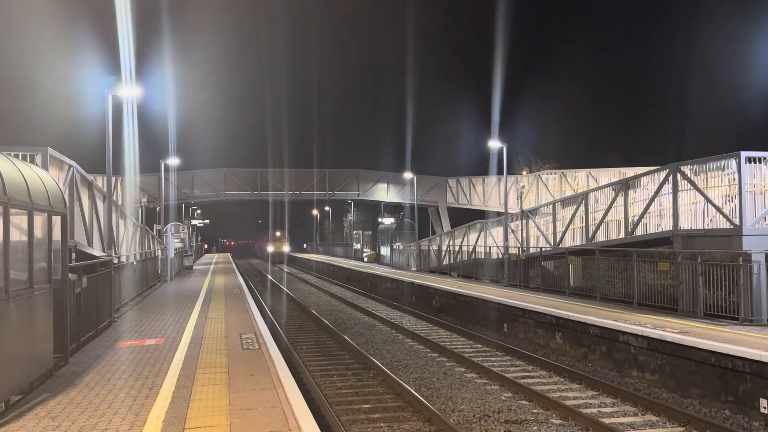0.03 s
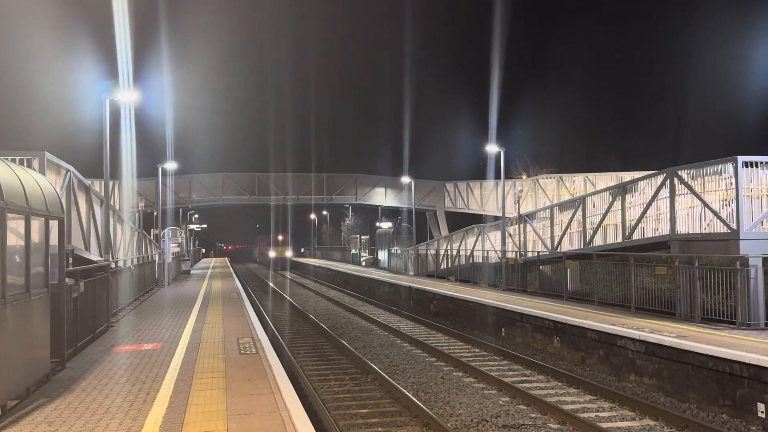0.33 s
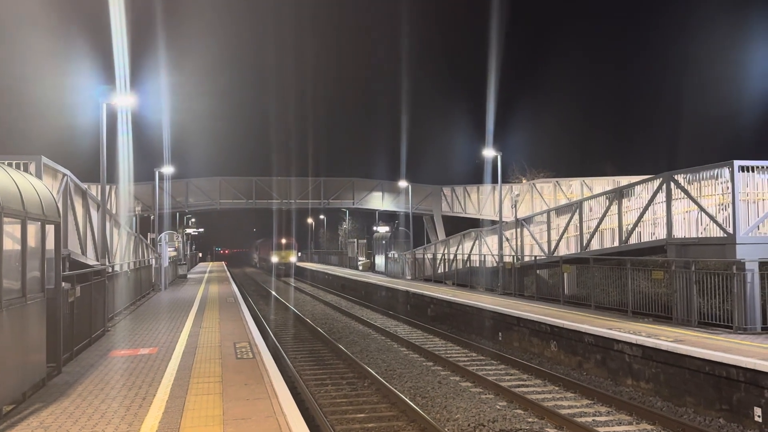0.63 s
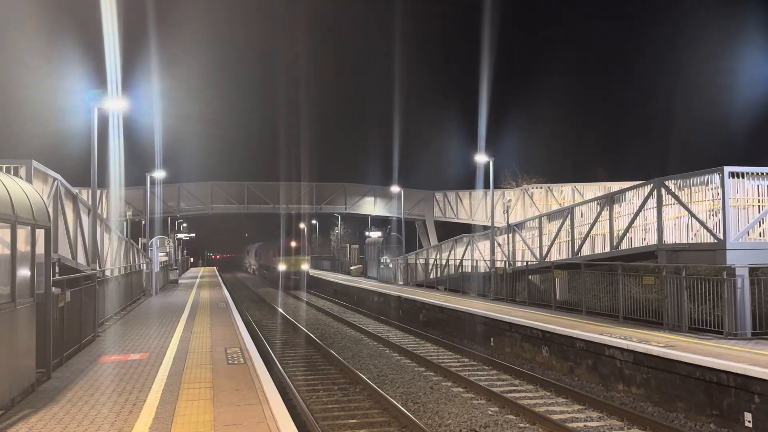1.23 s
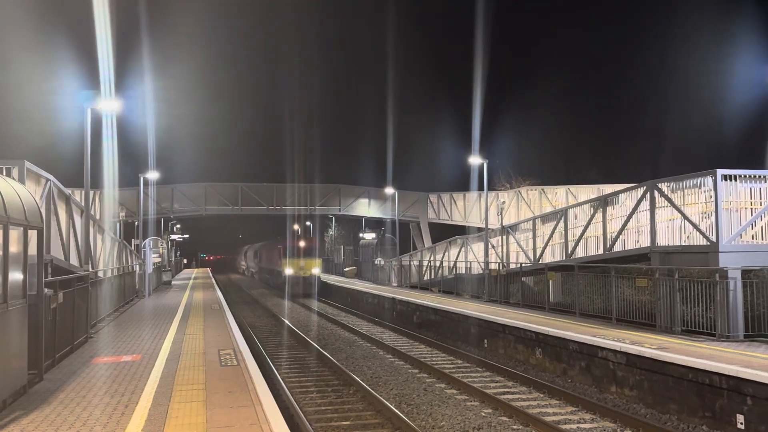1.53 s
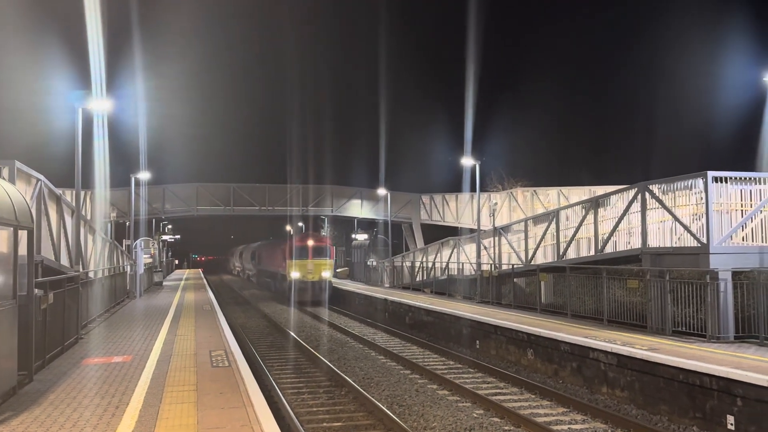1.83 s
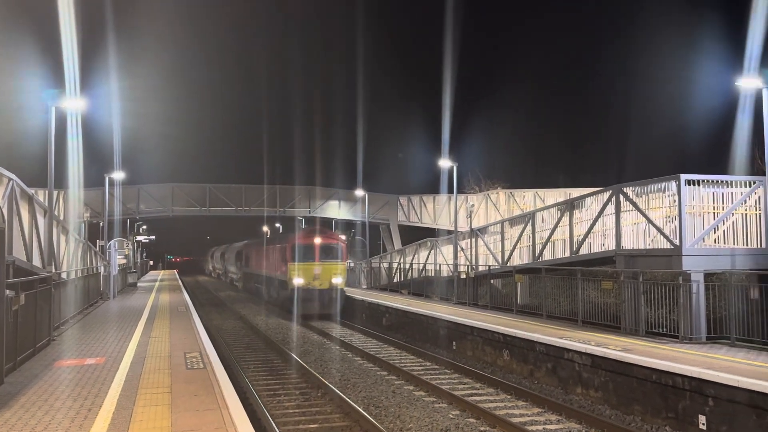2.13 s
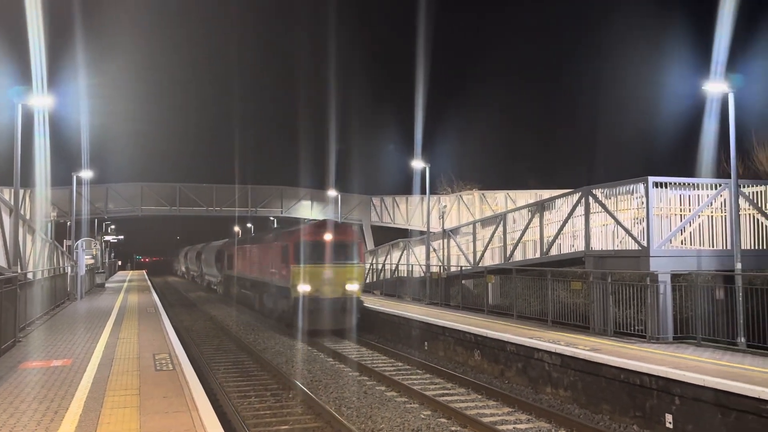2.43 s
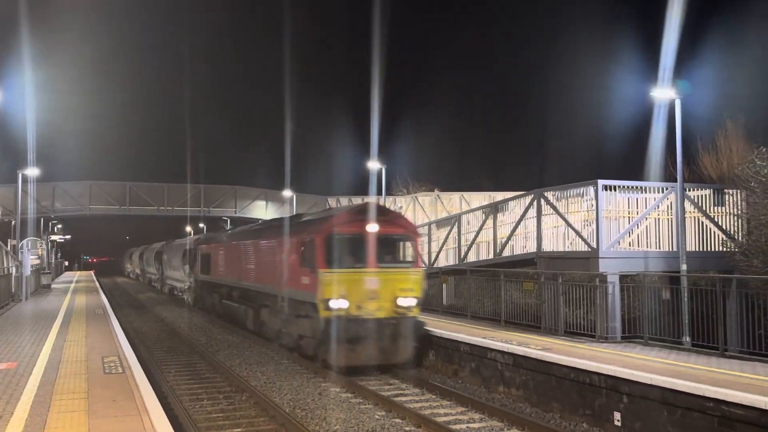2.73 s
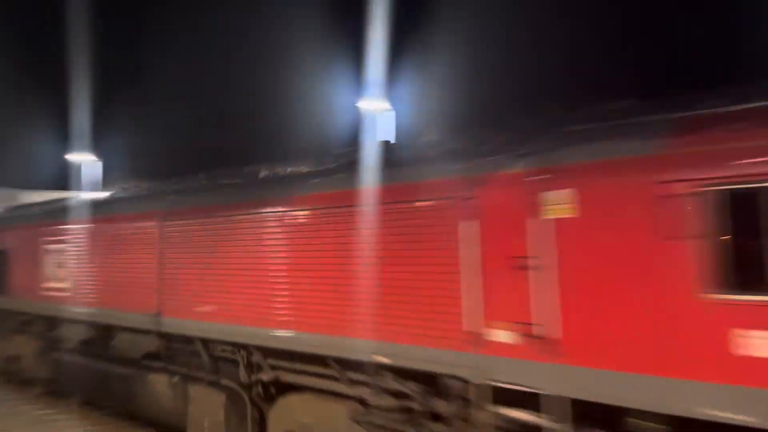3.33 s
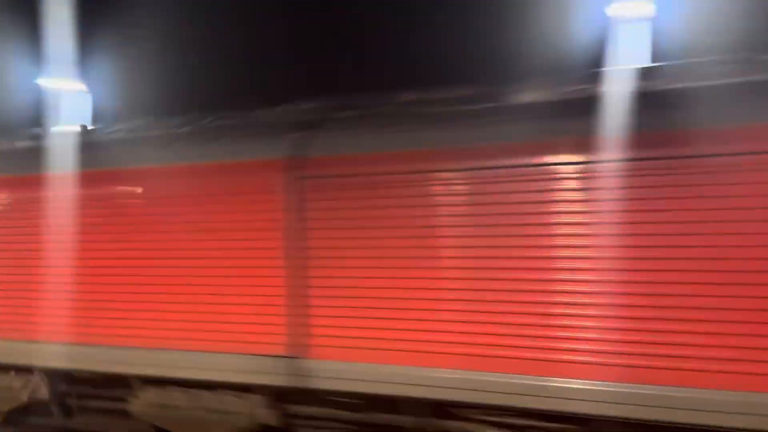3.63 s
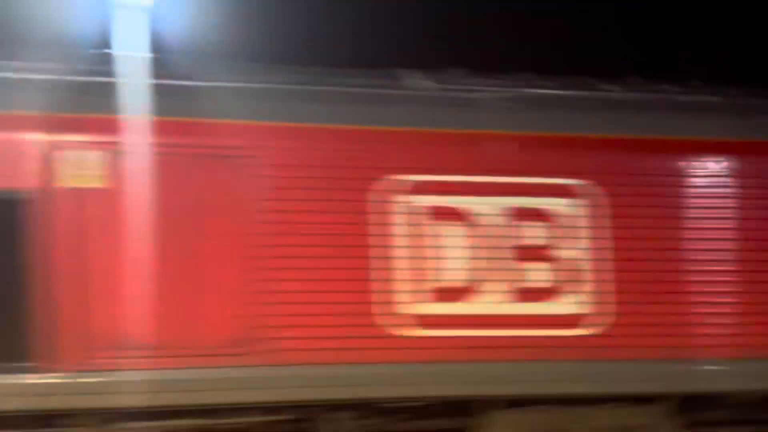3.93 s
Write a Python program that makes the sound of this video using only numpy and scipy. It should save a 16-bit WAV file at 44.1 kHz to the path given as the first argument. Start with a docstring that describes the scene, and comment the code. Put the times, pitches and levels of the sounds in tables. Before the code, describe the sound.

A diesel freight train approaches with a low, chugging engine throb and a faint pulsing whine. Dull microphone bumps come around 0.4 and 1 second. From about 2 seconds the engine and wheel roar swell. The locomotive passes close from 3.1 seconds, loudest near 3.5, with wheel knocks, ringing rails, hissing air and tones sagging in pitch. Two brief metal squeaks follow near 3.8 seconds as the roar eases slightly.

```python
"""A diesel freight locomotive passing a platform

The exhaust throbs at multiples of the crank rate, a traction motor whines in time with the wheels,
gears sing, wheels roar and knock on the rail, and air hisses from the flank. A few metres from the
track, a phone hears the sound swell with nearness and the tones sag by the Doppler effect."""
import sys
import numpy as np
from scipy import signal
from scipy.fft import rfft, irfft
from scipy.io import wavfile
from scipy.ndimage import uniform_filter1d, minimum_filter1d

SR = 44100
rng = np.random.default_rng(int(sys.argv[2]) if len(sys.argv) > 2 else 0)


def digitize_waveform(pressure):
    """Quantize a signal to 16-bit integers and store it at the path in sys.argv[1].

    Rows of a 2-D input are taken as channels; values are limited to [-1, 1].
    """
    field = np.atleast_2d(pressure).T
    bounded = np.clip(field, -1, 1)
    quanta = np.round(bounded * 32767).astype(np.int16)
    wavfile.write(sys.argv[1], SR, quanta)


N = 176400
TIME, BIN_HZ = np.arange(N) / SR, np.arange(N // 2 + 1) * SR / N
SPEED_M_S, TRACK_DISTANCE_M, SOUND_M_S = 20, 5.0, 343
FRONT_S, ENGINE_S, FLANK_S, REAR_S = 3.3, 3.6, 3.615, 3.864  # when each part is abreast


def undb(db):
    """Amplitude grows tenfold every 20 dB."""
    return 10 ** (np.asarray(db) / 20)


def unit(x):
    """Normalisation to an rms of 1."""
    return x / np.sqrt(np.mean(x ** 2))


def envelope(table):
    """Gain over time, interpolated in decibels."""
    return undb(np.interp(TIME, *np.array(table).T))


def per_bin(table):
    """A spectrum interpolated over log frequency."""
    hz, db = np.array(table).T
    return np.interp(np.log(BIN_HZ + 1e-3), np.log(hz), db)


def colour(x, table):
    """Spectral shaping, with steep slopes beyond the table's ends."""
    hz = BIN_HZ + .00091
    ends = (1 + (.8 * table[0][0] / hz) ** 8) * (1 + (hz / table[-1][0] / 1.1) ** 12)
    return unit(irfft(rfft(x) * undb(per_bin(table)) / np.sqrt(ends), N))


def white():
    """Two uncorrelated noises: the direct sound and what the station scatters."""
    return rng.standard_normal((2, N))


def resonance(hz, width_hz):
    """A resonance passes a narrow band of noise."""
    return unit(irfft(rfft(white()) / (1 + ((BIN_HZ - hz) / width_hz) ** 2), N))


def drift(rate_hz):
    """Smooth random fluctuation with a spread near 1."""
    hold = int(SR / rate_hz)
    steps = np.repeat(rng.standard_normal(N // hold + 1), hold)
    return 1.25 * uniform_filter1d(uniform_filter1d(steps, hold), hold)[:N]


def tone(cycles, waver_db=0):
    """A sine, direct and scattered, each with its own phase and amplitude modulation."""
    return np.array([2 ** .5 * np.sin(2 * np.pi * (cycles + rng.random())) * undb(waver_db * drift(4.15))
                     for _ in range(2)])


def hump(peak_s, spread_s):
    """A Gaussian rise and fall."""
    return np.exp(-np.minimum(((TIME - peak_s) / spread_s) ** 2, 50))


def burst(start_s, rise_s):
    """A transient that peaks after rise_s and decays exponentially."""
    age = np.maximum(TIME - start_s, 0) / rise_s
    return age * np.exp(1 - age)


def distance(abreast_s):
    """Metres to a source in uniform straight motion."""
    return np.hypot(SPEED_M_S * (TIME - abreast_s), TRACK_DISTANCE_M)


def spreading(abreast_s, power):
    """Geometric spreading: gain falls from 1 as a power of distance."""
    return (TRACK_DISTANCE_M / distance(abreast_s)) ** power


def emission_time(abreast_s):
    """Retarded time: the changing travel delay gives the Doppler shift."""
    return TIME - distance(abreast_s) / SOUND_M_S


# Each entry: time in seconds at which the engine is far, nearing, then about abreast.
APPROACH_S = [2.1, 3.05, 3.55]
# Each row: multiple of the crank rate, then relative level in dB at each of those three times.
CRANK_ORDERS = [(5, -23, -15, -12), (6, -14, -3, -6), (7, -7, -6, -13), (8, -13, -12, -19),
                (8.5, -11, -14, -25), (9, -8, -7, 1.5), (10, -9, -15, -12), (11.5, -12, -17, -14),
                (12, -16, -13, -13), (14, -23, -16, -5.5)]
# Each row: peak time in seconds, level in dB, spread in seconds, crank order that swells.
EXHAUST_CHUGS = [(.144, -29, .02, 9), (.335, -26, .025, 9), (.404, -23, .018, 9), (.6, -28, .02, 9),
                 (.723, -28, .02, 7), (.839, -26, .019, 9), (1.026, -25, .018, 10), (1.112, -28, .025, 9),
                 (1.216, -24, .018, 9), (1.354, -26, .02, 9), (1.461, -25, .016, 9), (1.574, -27, .03, 7),
                 (1.688, -24, .019, 9), (1.837, -24, .018, 9), (2.044, -20, .023, 9), (2.201, -15, .038, 9),
                 (2.409, -19, .017, 9), (2.465, -16.5, .016, 10), (2.534, -18, .016, 9),
                 (2.632, -18, .03, 7), (2.762, -17, .026, 7), (2.935, -19, .035, 7), (3.1, -14, .023, 7),
                 (3.488, -17, .027, 9), (3.567, -21, .018, 9), (3.654, -23, .03, 9)]
# Each row: time in seconds, relative level in dB.
EXHAUST_LEVEL = [(0, -27.5), (.35, -27.5), (.7, -27.5), (1.2, -22.5), (1.9, -21), (2.2, -15.5),
                 (2.35, -18.5), (2.7, -15.5), (3.1, -16), (3.55, -15), (3.8, -19.5), (4, -21.5)]
# Each row: frequency in Hz, relative level in dB.
SILENCER_SPECTRUM = [(20, -23), (33, -16), (48, -17), (68, -1.5), (95, 0.5), (130, -14), (200, -21),
                     (400, -33.5), (1200, -75)]


def exhaust(crank_hz=8.335, cylinders=12):
    """Periodic excitation: unequal cylinders throb, heavy firings chug, pulses boom in the silencer."""
    turns = crank_hz * emission_time(ENGINE_S)
    level = envelope(EXHAUST_LEVEL)
    throb = 0
    for order, *stage_db in CRANK_ORDERS:
        steady = level * undb(np.interp(TIME, APPROACH_S, stage_db) - 2)
        chugs = sum(undb(db) * hump(peak, spread)
                    for peak, db, spread, chug_order in EXHAUST_CHUGS if chug_order == order)
        throb += (steady + chugs) * tone(order * turns, waver_db=1.5)
    firings = np.diff(np.floor(turns * cylinders), append=0) > 0
    uneven_pulses = firings * white() * undb(4 * drift(30))
    return throb + undb(-5.5) * level * colour(uneven_pulses, SILENCER_SPECTRUM)


# Each row: time in seconds, level of the whole train's roar in dB.
ROAR_LEVEL = [(0, -37.5), (.6, -36), (1.2, -33.5), (1.5, -31.5), (2.2, -29), (2.7, -23.5), (3.1, -22.5),
              (3.5, -16.5), (4, -24.5)]
# Each row of these three: frequency in Hz, relative level in dB.
TRAIN_SPECTRUM = [(100, -11), (150, -5.5), (250, -7.5), (317, -10.5), (362, -6.5), (460, -10.5), (600, -10),
                  (663, -7.5), (720, -10.5), (920, -7.5), (1140, -12), (1340, -8.5), (1430, -18.5),
                  (1690, -15.5), (1920, -19.5), (2120, -17), (2620, -31), (3300, -29), (4500, -38.5),
                  (5800, -47.5), (7000, -39), (9000, -56)]
FRONT_BOGIE_SPECTRUM = [(82, -29), (140, -5), (519, -10), (642, -1), (781, -10.5), (966, -4), (1180, -26.5),
                        (1300, -10), (1530, -15), (1690, -21.5), (2260, -21.5), (2540, -43.5), (4500, -30),
                        (5130, -38), (7000, -40), (9100, -50), (15400, -120)]
REAR_BOGIE_SPECTRUM = [(82, -40), (140, -4), (283, -2.5), (545, -6), (663, -3), (950, -3.5), (1140, -12.5),
                       (1800, -13), (2190, -16), (2460, -23.5), (4150, -24.5), (5050, -36), (7000, -32.5),
                       (9100, -54), (15400, -120)]


def rolling():
    """Rolling noise: the long train roars from afar, and each bogie swells over it as it nears."""
    parts = [(TRAIN_SPECTRUM, envelope(ROAR_LEVEL)),
             (FRONT_BOGIE_SPECTRUM, undb(-15) * spreading(FRONT_S, power=1.303)),
             (REAR_BOGIE_SPECTRUM, undb(-14) * spreading(REAR_S, power=1.7))]
    return sum(colour(white(), spectrum) * gain * undb(1.25 * drift(45)) for spectrum, gain in parts)


# Each row of both: start in seconds, level in dB, centre frequency in Hz.
WHEEL_KNOCKS = [(3.134, -10.5, 850), (3.222, -15, 1150), (3.305, -18.5, 720), (3.655, -18, 850)]
METAL_SQUEAKS = [(3.742, -19, 1830), (3.872, -19.5, 1840)]


def knocks_and_squeaks():
    """Damped resonance: wheels knock on the rail in broad bands, metal squeaks in narrower ones."""
    knocks = sum(undb(db) * burst(start, .016) * resonance(hz, .4 * hz)
                 for start, db, hz in WHEEL_KNOCKS)
    squeaks = sum(undb(db) * burst(start, .0086) * resonance(hz, .21 * hz)
                  for start, db, hz in METAL_SQUEAKS)
    return knocks + squeaks


# Each row: frequency in Hz, level in dB, peak time in seconds, spread in seconds.
TRACK_MODES = [(594, -24.5, 3.27, .08), (626, -22, 3.29, .07), (651, -19.5, 3.41, .14),
               (1258, -22.5, 3.52, .13), (1325, -25, 3.41, .09)]


def track_ringing():
    """The track resonates under the front bogie; a source at rest has no Doppler shift."""
    return sum(undb(db + 1.6 * drift(60)) * hump(peak, spread) * tone(hz * TIME + .075 * drift(40))
               for hz, db, peak, spread in TRACK_MODES)


# Each row: source frequency in Hz, width in Hz, level abreast in dB, power of distance.
WHEEL_BANDS = [(344.7, 12, -31, 0.9), (578, 17, -31, 1.02), (726, 14, -34.5, 0.67), (795, 14, -31, 0.7),
               (1243, 54, -29, 1.7), (1479, 17, -40, 0.62), (1610, 58, -30.5, 1.07), (2136, 43, -36, 1.6),
               (4550, 98, -38.5, 1.9), (6110, 90, -44, 2.3)]


def wheel_singing():
    """Narrow-band noise makes the wheels' rough tones, lowered in passing by the Doppler effect."""
    emitted = emission_time(FRONT_S + .07945) % (N / SR)
    out = 0
    for hz, width, db, power in WHEEL_BANDS:
        shifted = np.array([np.interp(emitted, TIME, band) for band in resonance(hz, width)])
        out += shifted * undb(db) * spreading(FRONT_S + .21, power)
    return out


# Each row: source frequency in Hz, level in dB, then time abreast, peak time and spread in seconds.
GEAR_WHINES = [(1280, -30, 3.38, 3.04, .34), (1258, -33, 3.98, 3.85, .25), (1205, -40, 3.6, 2.9, .25),
               (1670, -34.5, 3.6, 3.2, .48), (1630, -32.5, 3.38, 3.12, .38)]


def gears():
    """Directivity: each whine is beamed ahead of its axle, so it peaks before the axle passes."""
    out = 0
    for hz, db, abreast, peak, spread in GEAR_WHINES:
        cycles = hz * emission_time(abreast) + .2 * drift(25.04)
        out += undb(db) * hump(peak, spread) * tone(cycles, waver_db=1.6)
    return out


# Each row: time in seconds, level at the crest of a throb in dB.
MOTOR_LEVEL = [(0, -37.5), (1.4, -36.5), (2.3, -35.5), (3.5, -35), (4, -39)]


def traction_motor(whine_hz=1234, wheel_hz=5.68):
    """Amplitude modulation: a thin, slightly rough whine throbs once per turn of the wheels."""
    emitted = emission_time(ENGINE_S)
    throb = (.5 + .5 * np.cos(2 * np.pi * (wheel_hz * emitted + .08))) ** 1.4
    whine = tone(whine_hz * emitted + .07 * drift(90), waver_db=.7)
    return envelope(MOTOR_LEVEL) * throb * whine


# Each row: frequency in Hz, relative level in dB.
AIR_SPECTRUM = [(1200, -48), (2600, 4), (4400, 1.5), (5200, -2.5), (6300, -2.5), (8000, -3.5), (10000, -4),
                (12000, -20.5), (15500, -19)]


def flank_air(loss_db_per_m=.2):
    """Air rushes from the flank, weakened by spreading and absorption; one spit adds to it in power."""
    absorption_db = loss_db_per_m * (distance(FLANK_S) - TRACK_DISTANCE_M)
    rush = undb(-31 + 1.1 * drift(23.14) - absorption_db) * spreading(FLANK_S, power=.7)
    spit = undb(-29) * burst(3.745, .021)
    return np.hypot(rush, spit) * colour(white(), AIR_SPECTRUM)


# Each row of both: frequency in Hz, relative level in dB.
SIZZLE_SPECTRUM = [(8000, -5), (10000, -2), (11500, -7), (13000, 10), (15500, -0.5)]
RAIL_SPECTRUM = [(3000, -24), (5900, -31), (6700, 4), (7600, -20), (10000, 3.5), (12000, -18.5),
                 (15500, -24)]


def wheel_and_rail_hiss():
    """Unequal spreading: the wheels sizzle close by, while the rails' thin hiss carries far ahead."""
    wheels = undb(-49.5 + 1.5 * drift(20)) * spreading(3.34, power=1.54)
    rails = undb(-47.5 + 1.1 * drift(21)) * spreading(FLANK_S, power=.45)
    return wheels * colour(white(), SIZZLE_SPECTRUM) + rails * colour(white(), RAIL_SPECTRUM)


# Each row: peak time in seconds, level in dB, spread in seconds, pitch in Hz.
MIC_BUMPS = [(.352, -28, .024, 139), (.394, -29, .014, 125), (.943, -22, .013, 145),
             (.972, -29.5, .017, 165), (1.115, -25, .014, 145)]
# Each row: frequency in Hz, relative level in dB.
BUMP_SPECTRUM = [(70, -1), (120, 3), (170, 0), (250, -2.5), (380, -17), (700, -41)]


def mic_bumps():
    """Direct excitation: wind or handling on the microphone makes dull thuds of low tone and rumble."""
    return sum(undb(db) * hump(peak, spread) * (tone(hz * TIME) + undb(-2) * colour(white(), BUMP_SPECTRUM))
               for peak, db, spread, hz in MIC_BUMPS)


# Each row: frequency in Hz, side minus mid level in dB.
STEREO_WIDTH = [(60, -25.5), (150, -18.5), (330, -14), (650, -5), (1250, -1.5), (1900, -10.5), (4000, -3.5),
                (6000, -8.5), (7300, -9), (8400, 67), (10000, 10), (13000, 2.5), (15500, -15)]
# Each row: frequency in Hz, left minus right level in dB.
STEREO_LEAN = [(100, 0.44), (1000, 0.41), (2200, 1.5), (4000, 0.86), (8000, 0.36)]


def scene():
    """Superposition of all sources in mid-side stereo: the bass is central, the treble wide."""
    mix = (exhaust() + rolling() + knocks_and_squeaks() + track_ringing() + wheel_singing()
           + gears() + traction_motor() + mic_bumps() + flank_air() + wheel_and_rail_hiss())
    fade = np.clip(np.minimum(TIME, TIME[::-1]) / .003, 0, 1)
    direct, scattered = rfft(fade * mix)
    width, lean = undb(per_bin(STEREO_WIDTH)), undb(per_bin(STEREO_LEAN) / 2)
    lead = .38  # part of the width that is a phase lead between the microphones
    apart = 1j * lead * direct + np.sqrt(1 - lead ** 2) * scattered
    mid, side = np.array([direct, apart * width]) / np.hypot(1, width)
    return irfft(np.array([(mid + side) * lean, (mid - side) / lean]), N)


def record(dry, ceiling=.92, window_s=.003, cutoff_hz=15700):
    """Peak limiting: the phone ducks smoothly around the highest peaks, then a low-pass cuts the top."""
    window = int(window_s * SR)
    allowed_gain = ceiling / np.maximum(np.abs(dry).max(axis=0), ceiling)
    limited = dry * uniform_filter1d(minimum_filter1d(allowed_gain, window), window)
    return signal.sosfilt(signal.ellip(10, .2, 80, cutoff_hz, fs=SR, output="sos"), limited)


dry = scene()
out = record(dry)
digitize_waveform(out)
```